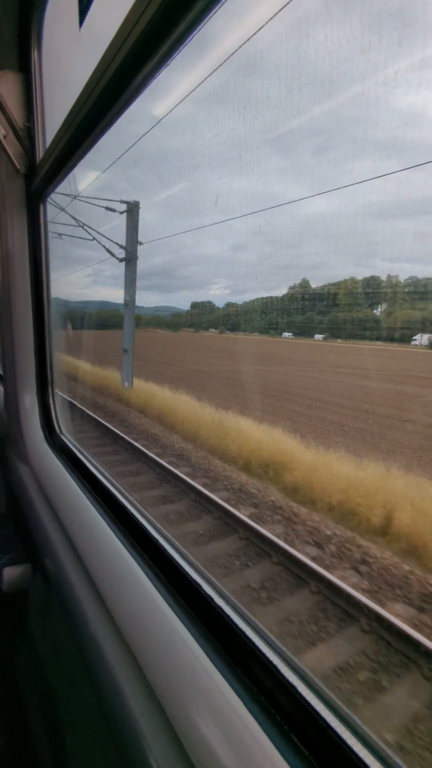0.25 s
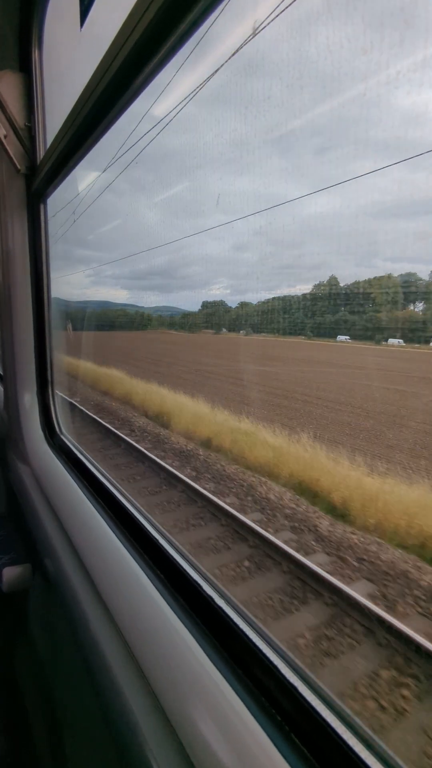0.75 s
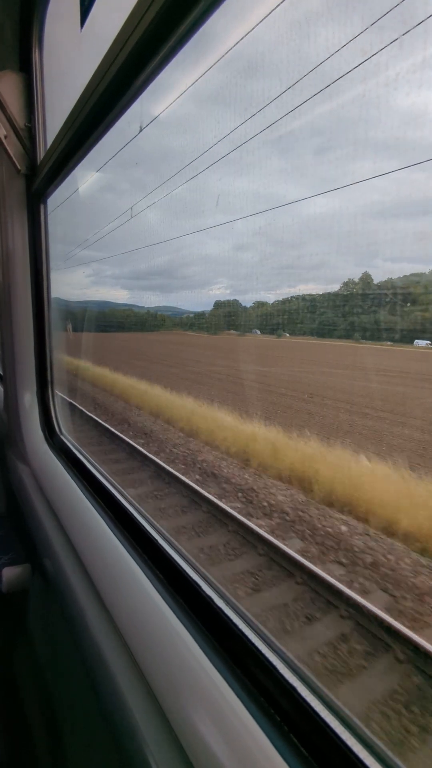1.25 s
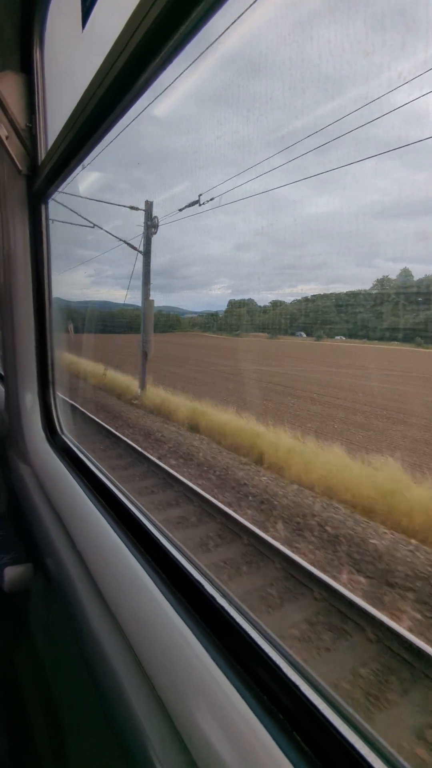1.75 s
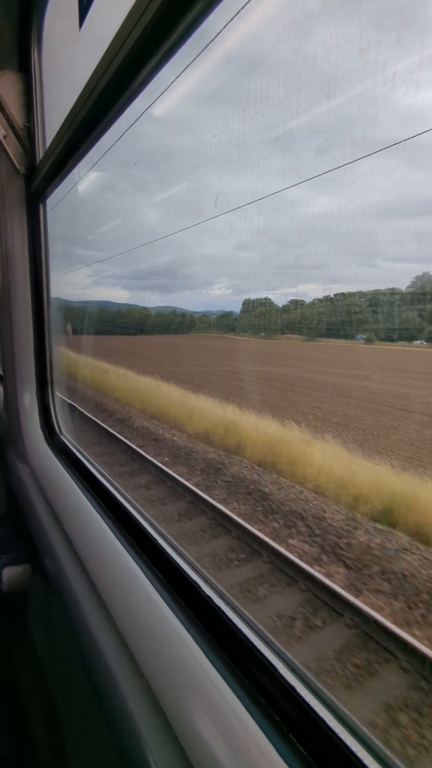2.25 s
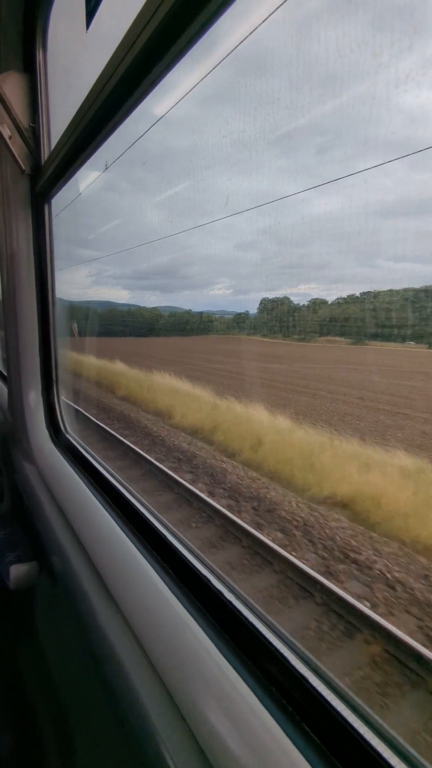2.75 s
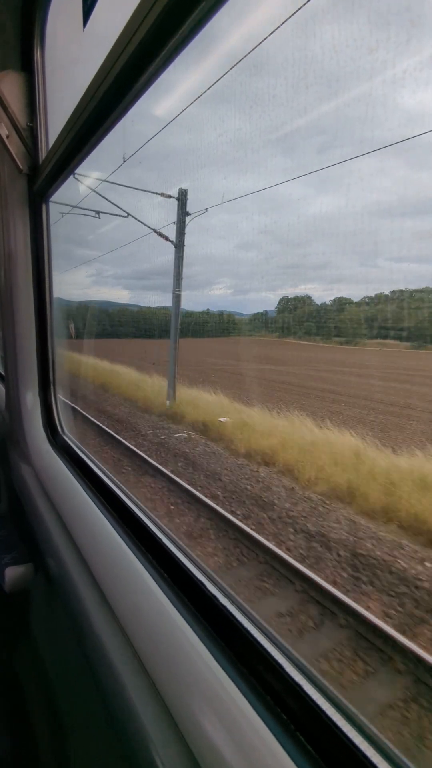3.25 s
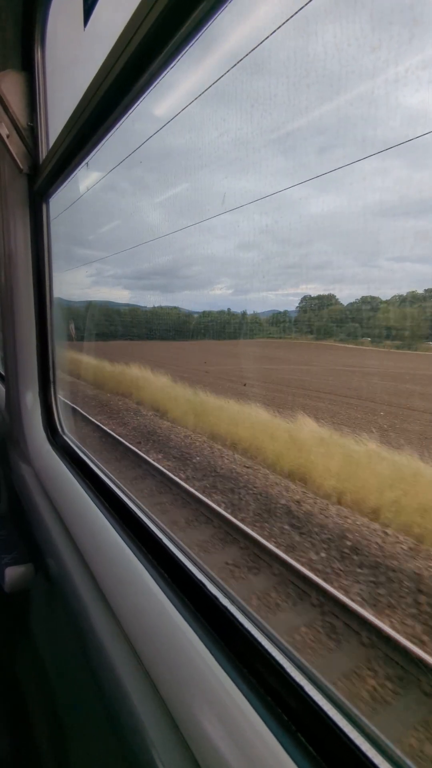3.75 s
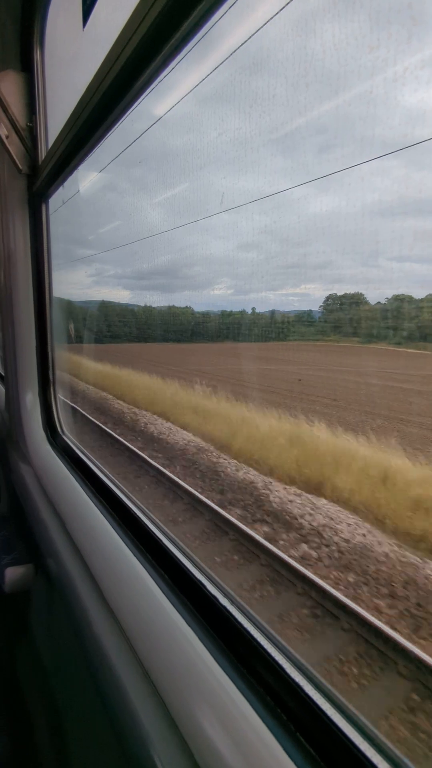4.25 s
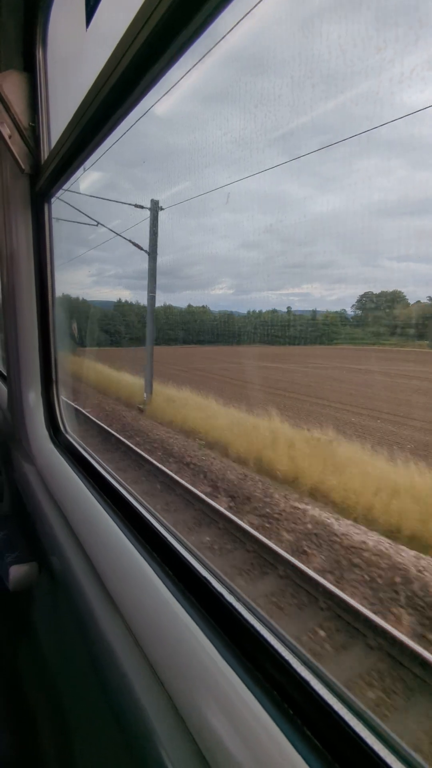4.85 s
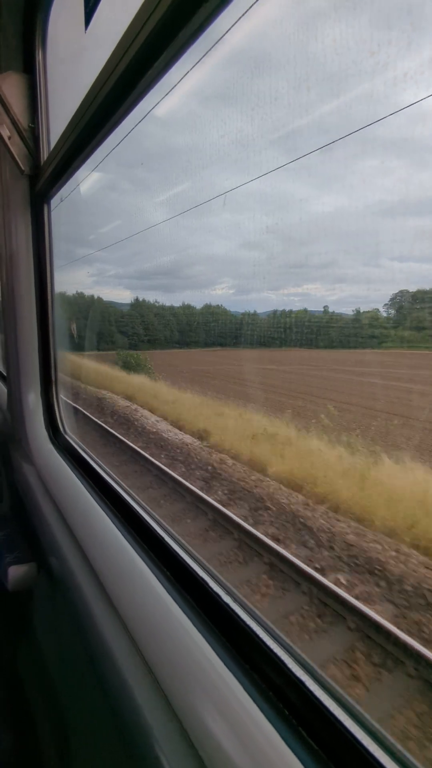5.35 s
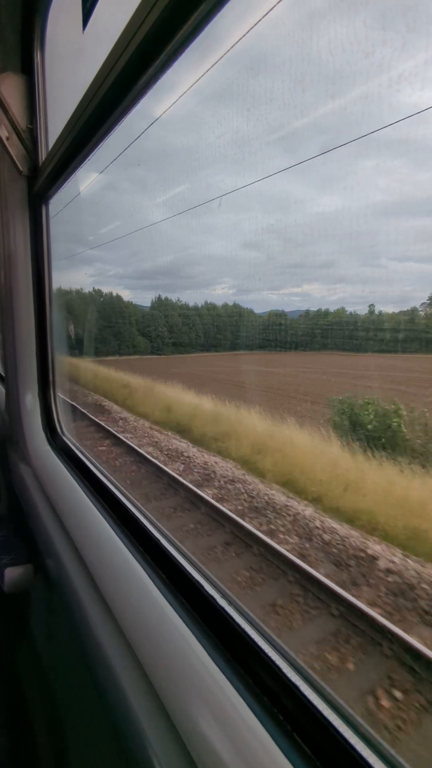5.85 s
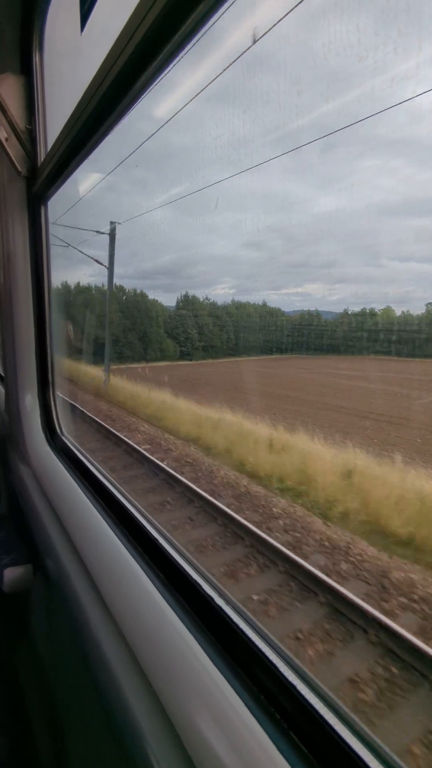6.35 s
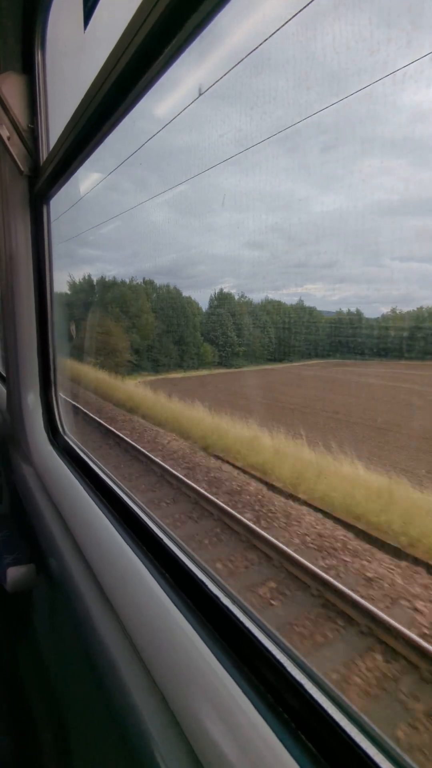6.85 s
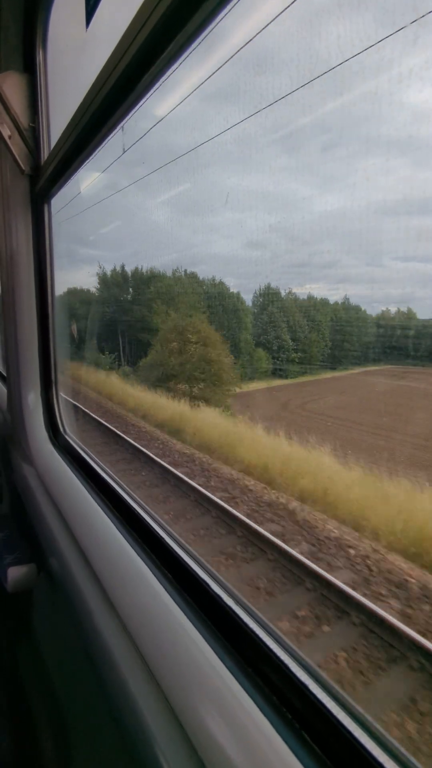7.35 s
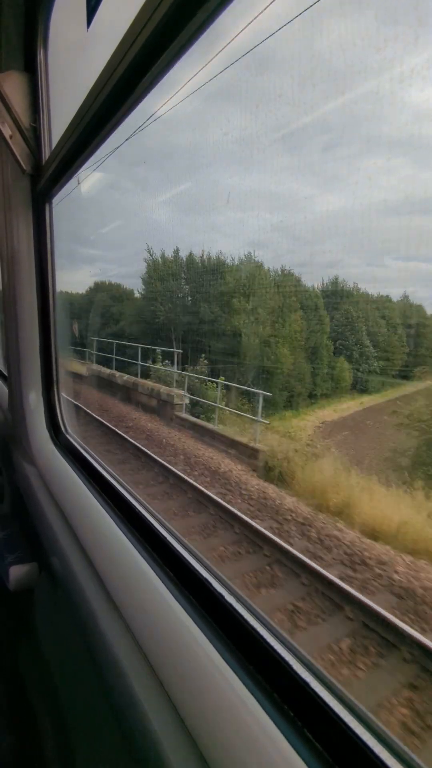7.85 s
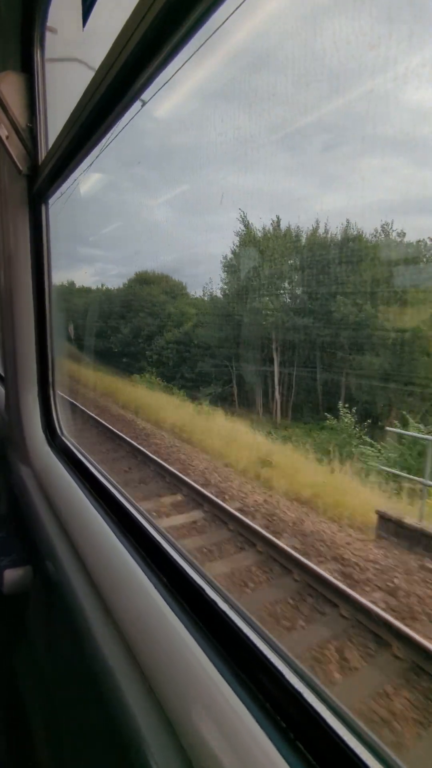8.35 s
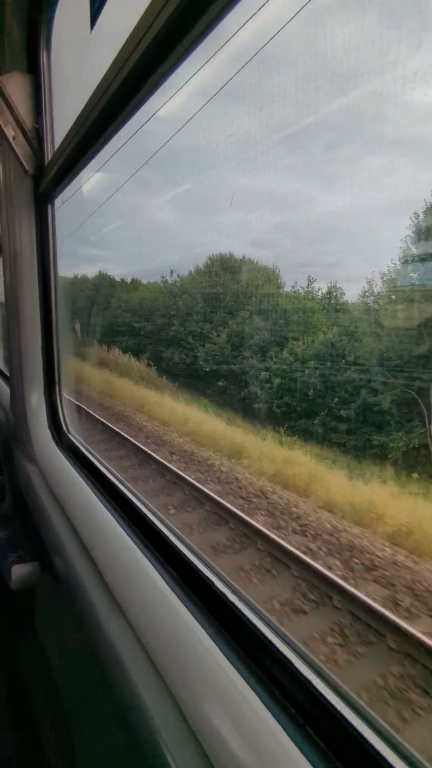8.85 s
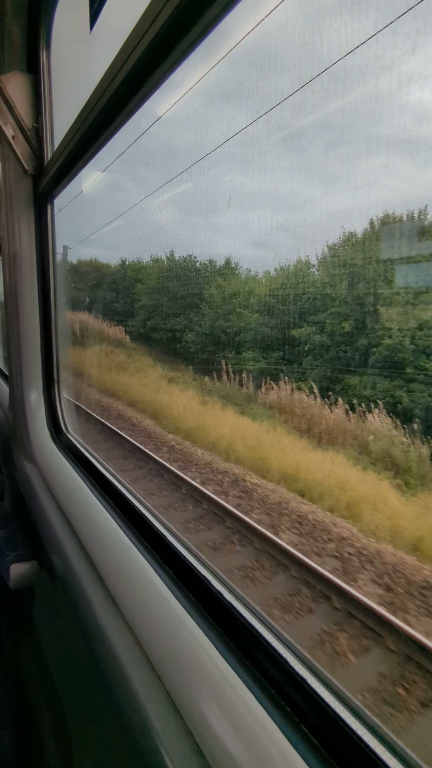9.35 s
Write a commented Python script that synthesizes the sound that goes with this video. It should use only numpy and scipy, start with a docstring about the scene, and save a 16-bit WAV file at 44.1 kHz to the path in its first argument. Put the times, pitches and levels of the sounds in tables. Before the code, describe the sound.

Close stereo microphones inside a train carriage pick up continuous booming hum, rolling rumble and broad airy noise. High whines shimmer above, rising very slightly in pitch with the speed. The hum grows fuller and rougher later on. Short muffled thuds and knocks from the rails interrupt irregularly; a brief clear squeak and a few dry rustles from cabin panels appear towards the end, and the ride simply continues.

```python
"""A strong motor hum and a high gear whine come first, heard within the cabin of a slowly quickening train.
Their pitch follows the speed; tones are wavering sines, and the sleepers shake the hum into sidebands. Beneath
lie the sleeper drone and filtered noise for rolling wheels, rail thuds and knocks, and air. Close by, the cabin
trim ticks, rustles and squeaks. A left and a right microphone pick it all up."""
import sys
import numpy as np
from scipy.fft import rfft, irfft, next_fast_len
from scipy.io import wavfile
from scipy.ndimage import map_coordinates

SR = 44100
rng = np.random.default_rng(int(sys.argv[2]) if len(sys.argv) > 2 else 0)


def store_wav(level_fs):
    """Save 16-bit WAV to argv[1]."""
    pcm = np.round(np.clip(np.atleast_2d(level_fs), -1, 1) * 32767)
    wavfile.write(sys.argv[1], SR, pcm.T.astype(np.int16))


N = 422919
T = np.arange(N) / SR
FROM_MIDDLE = T - T.mean()  # seconds before or after the middle of the scene
CRUISE_HZ = 2150.6  # pitch of the main whine at cruising speed
SLEEPER_HZ, WHEEL_HZ, HUM_HZ = 67.3, 59.2, 263.3  # at cruising speed


def amp(db):
    """Decibels to gain."""
    return 10 ** (np.asarray(db) / 20)


def unit(x):
    """Scale to rms 1."""
    return x / np.sqrt(np.mean(np.abs(x) ** 2) + 1e-20)


def along(points, hz):
    """Interpolate (frequency [Hz], value) points on a log frequency axis."""
    f, v = np.transpose(points)
    return np.interp(np.log(hz + 1), np.log(f + 1), v)


def curves(rows):
    """One value per sample for each column after the time."""
    s, *cols = np.transpose(rows)
    return [np.interp(T, s, c) for c in cols]


def wobble(rate):
    """A smooth random curve through normal-distributed knots, rate knots a second."""
    coarse = T[::64]
    knots = rng.standard_normal(2048)
    return np.interp(T, coarse, map_coordinates(knots, [coarse * rate], mode="wrap"))


def tone(cycles, scatter, rate):
    """A tone of rms 1; shifting paths through the car body scatter its size and phase."""
    phase = 2 * np.pi * (cycles + rng.random())
    in_phase = (1 + scatter * wobble(rate)) * np.sin(phase)
    return unit(in_phase + scatter * wobble(rate) * np.cos(phase))


def ear_tones(cycles, scatter, rate):
    """The same tone at both microphones, scattered separately on its way to each."""
    return np.array([tone(cycles, scatter, rate) for _ in range(2)])


def swell(s, length):
    """A bell-shaped envelope around time s; length is its standard deviation in seconds."""
    return np.exp(-.5 * np.minimum(((T - s) / length) ** 2, 100))


def strike(s, attack, decay):
    """An envelope that rises quickly at time s and dies away; attack and decay in seconds."""
    age = np.maximum(T - s, 0)
    return (1 - np.exp(-age / attack)) * np.exp(-np.minimum(age / decay, 50))


# likeness of cabin noise at the two microphones: (frequency [Hz], correlation [-1 to 1])
LEFT_RIGHT_LIKENESS = [(60, 1), (93, 0.87), (150, 0.84), (230, 0.75), (350, 0.51), (550, 0.42), (850, 0.25),
                       (1320, -0.19), (2060, 0.093), (3200, 0.064)]
# balance of cabin noise: (frequency [Hz], left minus right [dB])
LEFT_RIGHT_BALANCE = [(100, -0.5), (260, -2.5), (500, 1), (1000, -0.5), (1750, -3.5), (2300, 0.5),
                      (3300, 3), (5000, -4), (7200, 2), (11000, 2.5)]


def rush(spectrum):
    """Stereo noise of rms 1, mixed from mid and side for the cabin's left-right likeness and balance."""
    m = next_fast_len(N + 8192)
    hz = np.fft.rfftfreq(m, 1 / SR)
    skirt = 1 / (1 + (hz / (1.2 * spectrum[-1][0])) ** 12)  # roll-off above the last point
    colour = amp(along(spectrum, hz)) * skirt
    turn = np.arccos(np.clip(along(LEFT_RIGHT_LIKENESS, hz), -1, 1)) / 2
    mid, side = rfft(rng.standard_normal((2, m))) * colour * [np.cos(turn), np.sin(turn)]
    lean = amp(along(LEFT_RIGHT_BALANCE, hz) / 2)
    stereo = np.array([(mid + side) * lean, (mid - side) / lean])
    return unit(irfft(stereo, m)[:, :N])


# the train's speed, told by the main whine: (time [s], pitch [Hz])
SPEED_PITCH = [(0, 2120.5), (3, 2139.5), (4, 2145.2), (7, 2165.3), (8, 2173.3), (9.6, 2182.5)]


def travel():
    """Distance run, in seconds at cruising speed; every speed-bound tone takes its phase from it."""
    return np.cumsum(curves(SPEED_PITCH)[0]) / CRUISE_HZ / SR


# air over the body and from the vents, spectrum shape: (frequency [Hz], relative density [dB per Hz])
VENT_COLOUR = [(1700, -28.5), (2050, 0), (2300, -1.5), (2620, -0.5), (2900, -8.5), (3250, -16.5),
               (3650, -17.5), (3900, -16.5), (4900, -24.5), (5900, -24.5), (6230, -21), (6600, -26),
               (7400, -29), (8100, -47)]
# thin hiss of air, spectrum shape: (frequency [Hz], relative density [dB per Hz])
HISS_COLOUR = [(5000, -25.5), (7200, -1.5), (8050, -5), (8500, -3), (10300, -3), (11000, -9.5),
               (12500, -15), (14000, -30.5), (15700, -20)]
HISS_START_DB, HISS_RISE_DB_PER_S = -67, 0.5  # rises as the train speeds up


def air():
    """Turbulent air as a broad rush of filtered noise, with a thin restless hiss on top that grows."""
    vent = amp(-41.5 + 0.29 * wobble(1.8) + 0.73 * wobble(14)) * rush(VENT_COLOUR)
    flicker = amp(1.1 * wobble(20) + .8 * wobble(90))
    hiss_level = amp(HISS_START_DB + HISS_RISE_DB_PER_S * T + .7 * wobble(5.4))
    return vent + hiss_level * flicker * rush(HISS_COLOUR)


# borders between the registers of the rumble: frequency [Hz]
REGISTER_BORDERS = [115, 230, 370]
SURGE_DB, SURGE_RATE = 2, 11  # depth, knots a second


def lumpy(x):
    """Each register of a noise surges and sags on its own; the whole keeps rms 1."""
    m = next_fast_len(N + 8192)
    bins = rfft(x, m)
    register = np.searchsorted(REGISTER_BORDERS, np.fft.rfftfreq(m, 1 / SR))
    out = np.zeros((2, N))
    for k in np.unique(register):
        band = irfft(bins * (register == k), m)[:, :N]
        out += band * amp(SURGE_DB * wobble(SURGE_RATE))
    return unit(out)


# low rolling noise in the cabin, spectrum shape: (frequency [Hz], relative density [dB per Hz])
RUMBLE_COLOUR = [(20, -31), (40, -14), (57, -6.5), (78, -4), (102, -3), (120, -8.5), (150, -4.5),
                 (178, -10), (205, -3), (260, 0), (300, -2), (350, -5), (420, -13.5), (540, -10.5),
                 (670, -17), (760, -35.5)]
# higher roar of the wheels, spectrum shape: (frequency [Hz], relative density [dB per Hz])
ROAR_COLOUR = [(380, -32.5), (650, -2), (719, -8), (1060, -3.5), (1770, -7), (2020, -6.5), (2050, -8),
               (2660, -33), (4510, -120)]
# wheels on rough stretches of rail: (time [s], level [dB], bell length [s])
ROUGH_STRETCHES = [(2.694, -31.5, 0.042), (4.138, -40.5, 0.11), (4.453, -33, 0.045), (8.107, -36, 0.039),
                   (8.41, -37, 0.052), (9.15, -31.5, 0.052)]
# spectrum shape of those thuds: (frequency [Hz], relative level [dB])
THUD_SPECTRUM = [(60, -11.5), (150, -1), (300, 2.5), (520, -7), (780, -9), (1050, -2.5), (1400, -17),
                 (2500, -28), (4000, -60.5)]
# brief swells of low tones and of the 1030 Hz drive tone:
# (time [s], frequency [Hz], level [dB], bell length [s])
TONE_SWELLS = [(.4, 1030, -44, 0.097), (.7, 98, -33, 0.055), (.73, 1038, -43, 0.027),
               (3.72, 60.7, -24, .09), (4.052, 1030, -45.5, 0.08), (4.388, 1034, -42, 0.089),
               (4.615, 98.5, -28, 0.085), (5.824, 59.8, -27, 0.037), (6.33, 61.7, -19, 0.04)]


def rolling():
    """Wheels excite rumble and roar, and dull thuds at rough rail; low and 1030 Hz tones swell briefly."""
    rumble = amp(-25.0 + 0.99 * wobble(2.7) + 0.32 * wobble(15)) * lumpy(rush(RUMBLE_COLOUR))
    roar = amp(-36 + 0.73 * wobble(15)) * rush(ROAR_COLOUR)
    thud_level = sum(amp(db) * swell(s, length) for s, db, length in ROUGH_STRETCHES)
    thuds = thud_level * rush(THUD_SPECTRUM)
    tone_swells = sum(amp(db) * swell(s, length) * tone(hz * T, scatter=0.34, rate=15)
                      for s, hz, db, length in TONE_SWELLS)
    return rumble + roar + thuds + tone_swells


# wheels on sharp flaws in the rail: (time [s], level [dB], decay time [s])
RAIL_FLAWS = [(1.91, -24.5, 0.045), (2.095, -27, 0.018), (2.226, -27, .028), (2.512, -29, .014),
              (2.742, -31, .017), (5.033, -26, 0.02), (5.058, -25.5, 0.028), (6.125, -19, 0.013),
              (6.148, -25, 0.017), (6.187, -26, 0.013), (7.706, -25.5, 0.036), (8.056, -28, 0.014),
              (8.082, -26.5, 0.023), (8.151, -32, .016), (9.145, -28, 0.02)]
# spectrum shape of the knocks: (frequency [Hz], relative level [dB])
KNOCK_SPECTRUM = [(60, -11.5), (150, -4.5), (300, 1), (520, -2), (780, -8.5), (1050, -3), (1400, -11),
                  (2500, -27), (4000, -60)]


def knocks():
    """Flaws in the rail strike the wheels; the floor passes on a short dull knock."""
    level = sum(amp(db) * strike(s, attack=0.0021, decay=decay) for s, db, decay in RAIL_FLAWS)
    return level * rush(KNOCK_SPECTRUM)


def squeak(hz, rough):
    """A slipping contact whose pitch and size shift every few cycles."""
    rate = hz / 7.6  # cycles held before the contact catches anew
    pitch = hz * (1 + rough * wobble(rate))
    return tone(np.cumsum(pitch) / SR, scatter=.35, rate=rate)


# trim ticking: (time [s], level [dB], bell length [s])
TRIM_TICKS = [(0.577, -62.5, 0.016), (2.152, -64.5, 0.0091), (2.251, -70.5, .015), (2.575, -68.5, 0.011),
              (3.77, -70.5, 0.06), (3.873, -60, 0.016), (4.15, -62.5, 0.024), (5.258, -69.5, 0.011),
              (5.861, -62, 0.044), (6.699, -63, 0.014), (7.424, -62, 0.01), (8.052, -60.5, 0.011),
              (8.673, -59, 0.018), (9.27, -61.5, 0.068), (9.461, -65, .04)]
# spectrum shape of the ticks: (frequency [Hz], relative level [dB])
TICK_SPECTRUM = [(1500, -16), (2700, 5.5), (4000, 2), (7000, -1.5), (8050, -4.5), (10000, -2.5),
                 (12500, -10.5), (15500, -22)]
# short dry rustles in the cabin: (time [s], level [dB], bell length [s])
DRY_RUSTLES = [(.85, -55, .015), (2.717, -44.5, 0.023), (6.962, -47, 0.023), (8.508, -42, .03),
               (8.68, -38, 0.031), (8.766, -47, .04)]
# spectrum shape of the rustles: (frequency [Hz], relative level [dB])
RUSTLE_SPECTRUM = [(1200, -10.5), (1900, 0), (2700, 5.5), (3300, -7.5), (4000, -6.5), (4700, -22),
                   (6000, -23.5), (9000, -34)]
# trim rubbing: (time [s], frequency [Hz], level [dB], bell length [s], rms pitch scatter [share])
TRIM_SQUEAKS = [(3.006, 4210, -56, .013, .024), (3.074, 4240, -55.5, .018, .024),
                (3.146, 4240, -54, .017, .02), (3.21, 4250, -63, .025, .04),
                (5.914, 4210, -51.5, .013, .01), (7.815, 2600, -37.5, 0.022, .008)]
GRAIN_DB, GRAIN_RATE = 0.5, 280  # unevenness of ticks and rustles: depth, knots a second


def trim():
    """Shaken panels tick and rustle in bursts of noise and give short rough squeaks."""
    ticks = sum(amp(db) * swell(s, length) for s, db, length in TRIM_TICKS) * rush(TICK_SPECTRUM)
    rustles = sum(amp(db) * swell(s, length) for s, db, length in DRY_RUSTLES) * rush(RUSTLE_SPECTRUM)
    grain = unit(amp(GRAIN_DB * wobble(GRAIN_RATE)))  # the surfaces catch and slip
    squeaks = sum(amp(db) * swell(s, length) * squeak(hz, rough)
                  for s, hz, db, length, rough in TRIM_SQUEAKS)
    return (ticks + rustles) * grain + squeaks


# overtones of the sleeper beat: (multiple of the sleeper rate, level [dB])
BEAT_OVERTONES = [(3, -38.5), (4, -41.5), (5, -42), (9, -52), (11, -51.5), (12, -54.5), (17, -52.5),
                  (18, -60), (19, -50), (20, -59.5), (21, -58.5), (23, -56), (28, -58)]


def sleeper_buzz(run):
    """Overtones of the sleeper beat lie in the roar as a faint comb, wavering at each microphone."""
    out = np.zeros((2, N))
    for k, db in BEAT_OVERTONES:
        out += amp(db) * ear_tones(round(k) * SLEEPER_HZ * run, scatter=0.74, rate=7)
    return out


# drone under the floor: (time [s], drone level [dB], octave level before a 2 dB cut [dB])
SLEEPER_DRONE = [(0.0, -29.5, -48), (0.56, -29.5, -25.5), (0.72, -29, -48), (1.15, -20.5, -37.5),
                 (2.48, -22.5, -33), (2.6, -20, -29), (3.56, -25, -36.5), (4.96, -29.5, -40),
                 (5.08, -35, -31.5), (5.76, -31, -38), (6.12, -51.5, -43.5), (6.32, -22.5, -48),
                 (6.52, -40, -52), (6.76, -24.5, -34), (7.2, -36.5, -43), (7.32, -20, -30),
                 (7.52, -42, -30), (7.8, -24.5, -27.5), (8.3, -24.5, -27.5), (9.6, -26.5, -38)]


def sleepers(run):
    """The wheels pass the sleepers in a deep drone that beats against an order of the wheels' turning."""
    drone_db, octave_db = curves(SLEEPER_DRONE)
    drone = amp(drone_db) * tone(SLEEPER_HZ * run, scatter=0.17, rate=9)
    octave = amp(octave_db - 2.0) * tone(2 * SLEEPER_HZ * run, scatter=0.22, rate=8.2)
    wheel = amp(-32.5 + 0.43 * FROM_MIDDLE) * tone(WHEEL_HZ * run, scatter=0.19, rate=6.1)
    return drone + octave + wheel


# weaker tones of motors and gears, levels at mid-scene:
# (frequency at cruising speed [Hz], left [dB], right [dB], growth [dB per s])
MOTOR_AND_GEAR_TONES = [(518, -45.5, -47.5, -0.5), (523, -45.5, -47, -0.1), (592.4, -47.5, -47, -1),
                        (638, -53, -49, -0.5), (657.5, -45.5, -54, 1.86), (970, -56.5, -55, 0),
                        (1030, -52, -49, -0.5), (1557, -56.5, -54.5, -1)]


def drive_tones(run):
    """Faint motor and gear tones follow the speed and flutter separately at each microphone."""
    out = np.zeros((2, N))
    for hz, left_db, right_db, growth_db in MOTOR_AND_GEAR_TONES:
        pair = ear_tones(hz * run + 0.044 * wobble(25), scatter=.5, rate=13)
        out += amp([[left_db], [right_db]]) * amp(growth_db * FROM_MIDDLE) * pair
    return out


# thinner whines above the main one, swelling as the speed carries them through a resonance:
# (frequency at cruising speed [Hz], left peak [dB], right peak [dB], time of peak [s], bell length [s])
THIN_WHINES = [(2423, -47, -48, 2.5, 2.8), (2424, -47, -48.5, 6.3, 2.5), (2542, -47, -44.5, 4.7, 1.25),
               (2550, -48.5, -48, 1.6, 1.8), (2750, -54, -56.5, 1.5, 1.7), (3840, -65, -60.5, 2.6, 1.2),
               (3830, -70, -65.5, 7.0, 2)]


def overwhines(run):
    """Thinner whines waver above the main one, each swelling through a resonance over seconds."""
    out = np.zeros((2, N))
    for hz, left_db, right_db, s, length in THIN_WHINES:
        pair = ear_tones(hz * run + 0.04 * wobble(20), scatter=0.46, rate=11)
        out += amp([[left_db], [right_db]]) * swell(s, length) * pair
    return out


# gear whine at the left microphone, before the flutter: (time [s], level [dB])
WHINE_LEFT = [(0.0, -40), (.36, -39.5), (.42, -39), (.48, -37), (.72, -38), (1.02, -40), (1.12, -33.5),
              (1.43, -42), (1.56, -33), (1.8, -42), (2.05, -45), (2.14, -31.5), (2.34, -52), (2.42, -39),
              (2.64, -40), (2.75, -37), (2.86, -33.5), (3.02, -36.5), (3.08, -32), (3.2, -34.5),
              (3.35, -25), (3.44, -36), (3.52, -27.5), (3.66, -32), (3.76, -29), (4.2, -33), (4.4, -27.5),
              (4.6, -27.5), (4.77, -36.5), (5.03, -25.5), (5.12, -32), (5.25, -28), (5.54, -32.5),
              (5.62, -42), (5.7, -33), (6.38, -30), (6.58, -29.5), (6.62, -37), (6.72, -29.5),
              (6.83, -36.5), (6.92, -32.5), (7.02, -40), (7.1, -42), (7.2, -29.5), (7.28, -45),
              (7.35, -41.5), (7.44, -28.5), (7.54, -37), (7.84, -31), (7.97, -38), (8.06, -30), (8.15, -39),
              (8.24, -30), (8.42, -28), (8.64, -36.5), (8.76, -31.5), (9.0, -31.5), (9.42, -34.5),
              (9.48, -44), (9.58, -33.5)]
# the right microphone, in a hollow of standing waves that shift as the pitch climbs:
# (time [s], level before the flutter [dB], lag behind the left [radians])
WHINE_IN_HOLLOW = [(0, -32.5, -1), (.8, -34, -0.2), (1.38, -41, -1.5), (1.56, -36, 0.1), (2.3, -50, -1.1),
                   (3.2, -39, -1.5), (3.6, -44, -2), (4.3, -38.5, -2), (4.7, -45, -3), (5.9, -41, -2.5),
                   (7.0, -43, -2.5), (7.7, -49.5, -4), (8.3, -49.5, -1), (9.6, -44, 0.5)]
WHINE_FLUTTER_DB, WHINE_FLUTTER_RATE = 1.53, 27  # depth, knots a second


def gear_whine(run):
    """The high whine flutters, and drifts from right to left through the cabin's standing waves."""
    left_db = curves(WHINE_LEFT)[0]
    right_db, right_lag = curves(WHINE_IN_HOLLOW)
    flutter = amp(WHINE_FLUTTER_DB * wobble(WHINE_FLUTTER_RATE) - 1.35)
    phase = 2 * np.pi * CRUISE_HZ * run + 0.27 * wobble(18)
    direct = np.sqrt(2) * amp([left_db, right_db]) * np.sin([phase, phase - right_lag])
    scattered = ear_tones(CRUISE_HZ * run, scatter=3.9, rate=20)
    return flutter * direct + amp([[-48], [-47]]) * scattered


# motor hum, before ear balance and flutter: (time [s], level [dB])
HUM_LEVEL = [(0.0, -19), (0.12, -31), (0.2, -21), (0.64, -27), (0.72, -20.5), (0.8, -23), (0.92, -19.5),
             (1.24, -23), (1.36, -18.5), (1.64, -24), (1.72, -15.5), (1.8, -23), (2.08, -18), (2.2, -27),
             (2.3, -16), (2.39, -23.5), (2.46, -14), (2.55, -20), (2.68, -21.5), (2.88, -18), (3.48, -18.5),
             (3.64, -21), (3.96, -17), (4.16, -20.5), (4.37, -14), (4.44, -17), (4.8, -20), (5.08, -17),
             (5.6, -16.5), (5.92, -13), (6.09, -15), (6.135, -20.5), (6.16, -16), (6.23, -20), (6.26, -15),
             (6.4, -14.5), (6.72, -16.5), (7.44, -14), (7.64, -16.5), (7.8, -15), (8.0, -17), (8.12, -22),
             (8.36, -13), (8.72, -21.5), (9.16, -14.5), (9.24, -18), (9.29, -18), (9.36, -14), (9.58, -17)]
# how hard the hum is shaken, before the sway: (time [s], sideband level [dB])
SHAKE_LEVEL = [(0.0, -37.5), (3.3, -35), (3.43, -47), (3.55, -31.5), (3.98, -42), (4.1, -33), (5.46, -40),
               (5.58, -28), (6.1, -31), (7.53, -27.5), (7.68, -39), (7.76, -25.5), (8.0, -33), (8.1, -24),
               (8.35, -31), (9.6, -30.5)]
# the hum shaken at the sleeper rate, gains at mid-scene:
# (multiple of the sleeper rate added, left [dB], right [dB], growth [dB per s])
HUM_SIDEBANDS = [(-1, -8, -12.5, -1), (1, -2.5, 0.5, 0), (2, -9, -6, -1.5)]
HUM_FLUTTER_DB, HUM_FLUTTER_RATE = 0.94, 17  # depth at mid-scene, knots a second
FLUTTER_FALL_DB_PER_S = 0.7  # the hum's flutter is deeper early, shallower late
SWAY_DB, SWAY_RATE = 1.5, 6  # the shaking comes and goes: depth, knots a second


def motor_hum(run, right_lag=0.15):
    """One motor order booms in the cabin, its flutter deeper early; the sleepers shake it into sidebands."""
    phase = 2 * np.pi * HUM_HZ * run + 0.22 * wobble(17)
    flutter_depth = HUM_FLUTTER_DB * amp(-FLUTTER_FALL_DB_PER_S * FROM_MIDDLE)
    flutter_db = flutter_depth * wobble(HUM_FLUTTER_RATE)
    level = amp(curves(HUM_LEVEL)[0] - 0.16 + flutter_db)
    ears = np.array([amp(-2.0) * np.sin(phase), amp(1.6) * np.sin(phase - right_lag)])
    hum = level * np.sqrt(2) * ears
    shake_db = curves(SHAKE_LEVEL)[0] + SWAY_DB * wobble(SWAY_RATE)
    for k, left_db, right_db, growth_db in HUM_SIDEBANDS:
        sideband = tone((HUM_HZ + round(k) * SLEEPER_HZ) * run, scatter=.45, rate=11)
        hum += amp([[left_db], [right_db]]) * amp(shake_db + growth_db * FROM_MIDDLE) * sideband
    return hum


def scene():
    """All that reaches the listener within the cabin, from the background to the motor."""
    run = travel()
    background = air() + rolling() + knocks() + trim()
    track = sleeper_buzz(run) + sleepers(run)
    machinery = drive_tones(run) + overwhines(run) + gear_whine(run) + motor_hum(run)
    return background + track + machinery


def record(dry):
    """Fade both ends over 4 ms and low-pass the scene."""
    m = next_fast_len(N + 8192)
    fade = np.clip(np.minimum(T, T[-1] - T) / .004, 0, 1)
    bins = rfft(dry * np.sin(np.pi / 2 * fade) ** 2, m)
    passed = np.fft.rfftfreq(m, 1 / SR) < 15750  # band limit in Hz
    return irfft(bins * passed, m)[:, :N]


dry = scene()
out = record(dry)
store_wav(out)
```